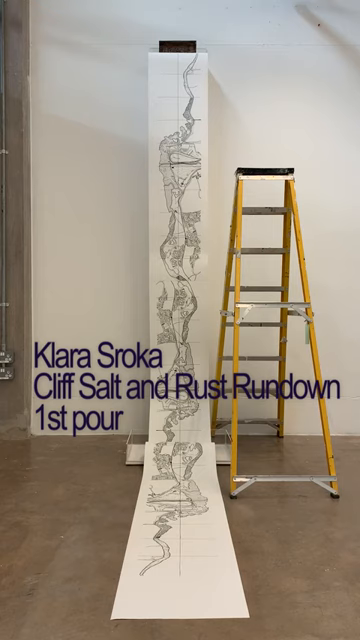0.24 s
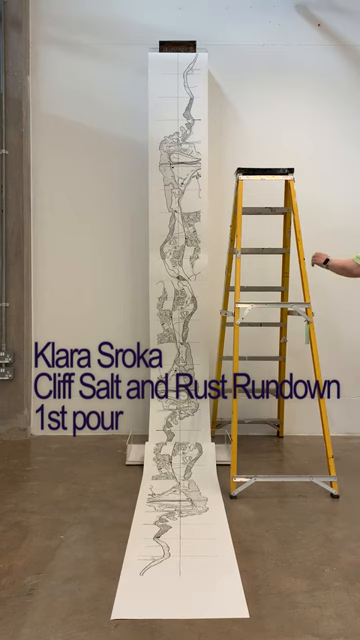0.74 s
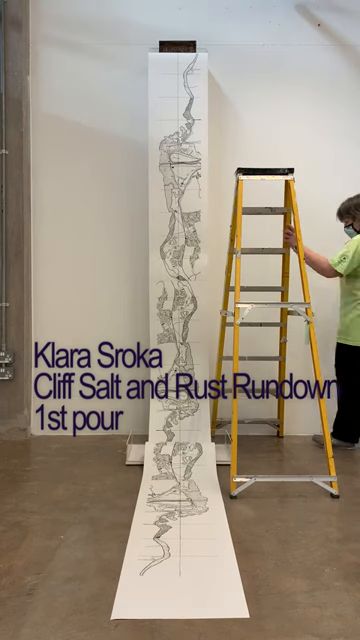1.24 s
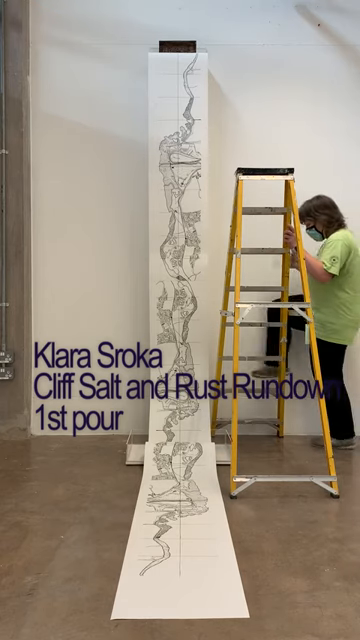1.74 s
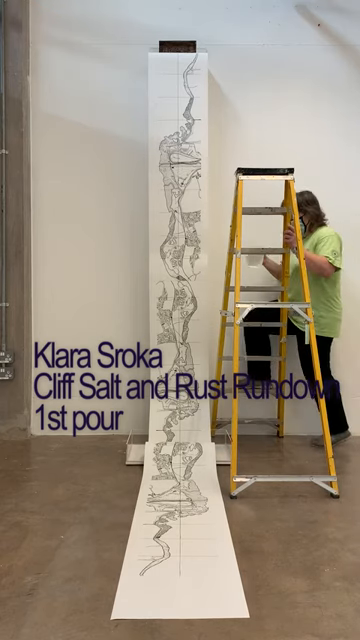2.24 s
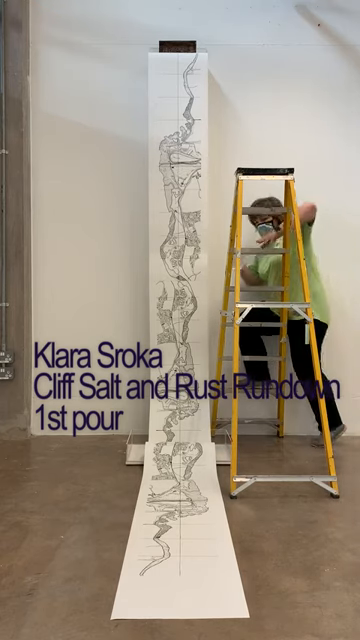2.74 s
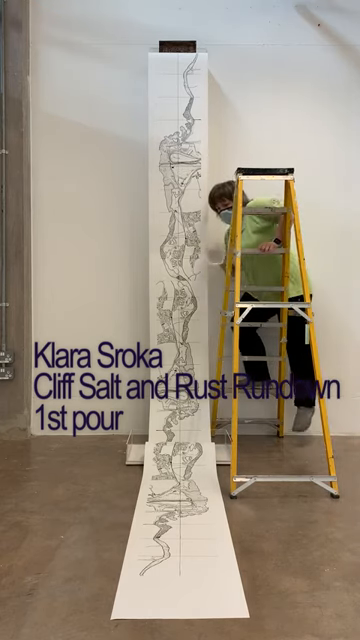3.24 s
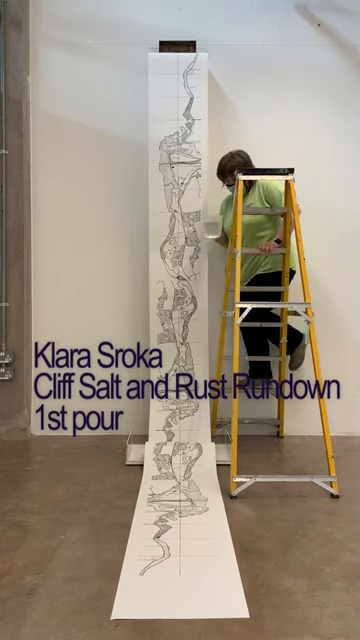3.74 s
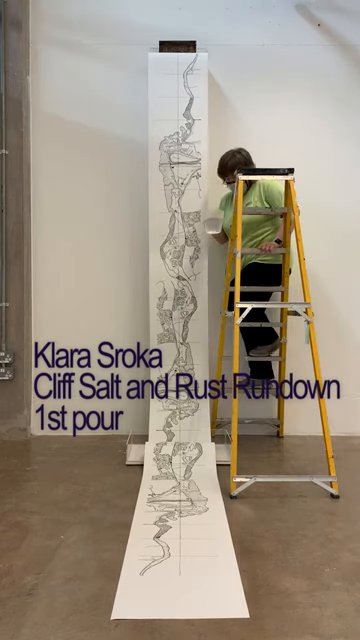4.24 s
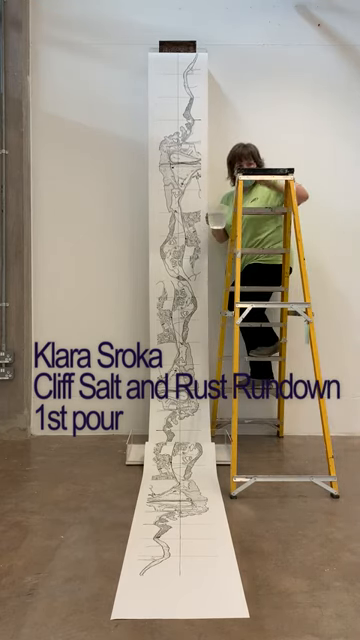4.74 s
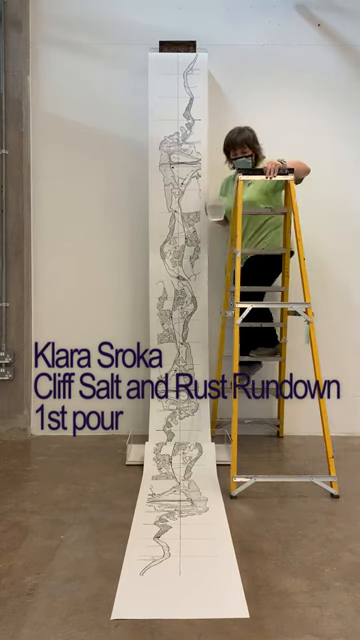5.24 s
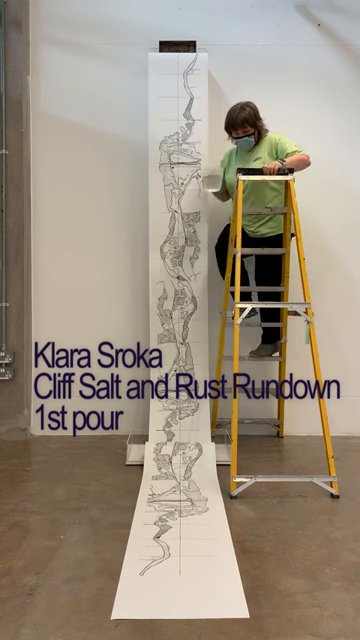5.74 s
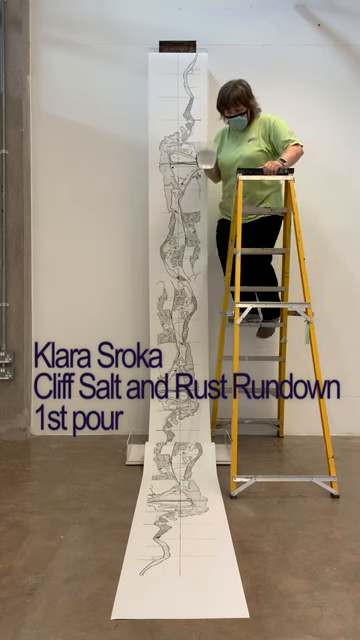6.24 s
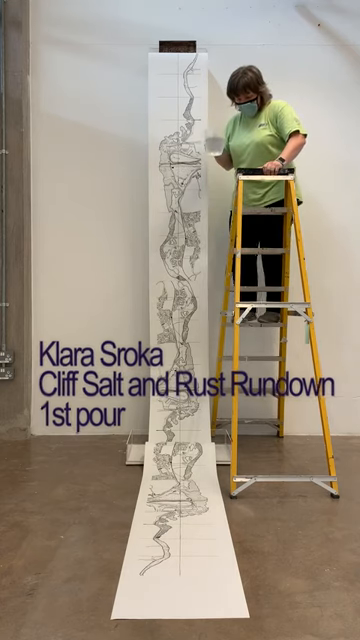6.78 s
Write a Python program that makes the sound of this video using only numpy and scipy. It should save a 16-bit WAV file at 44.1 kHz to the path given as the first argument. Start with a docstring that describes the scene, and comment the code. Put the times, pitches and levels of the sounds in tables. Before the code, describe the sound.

In a bare, reverberant room with low ventilation rumble and hum, soft footfalls and scuffing soles approach. After two seconds a rubber squeak and knocks mark the first step onto a stepladder. Its loose joints then clack sharply and rattle, with clothes swishing and dull shoe knocks on the rungs, busiest after five seconds. A stereo microphone hears it with a half-second tail.

```python
"""In a bare, hard-walled gallery, someone walks up to a tall stepladder and climbs it.
Shoes scuff and squeak by friction and knock on floor and ladder as filtered bursts of noise.
As the weight shifts, loose joints clack in short bright bursts; narrow and broad resonances ring with the blows.
Ventilation hums and hisses below; decaying noise gives the climber and ladder a tail of about half a second."""
import sys
import numpy as np
from scipy import signal
from scipy.fft import rfft, irfft, next_fast_len
from scipy.io import wavfile

SR = 44100
rng = np.random.default_rng(int(sys.argv[2]) if len(sys.argv) > 2 else 0)


def to_wav(sig):
    """Store sig (one row per channel, or 1-D mono) as 16-bit WAV at the path in sys.argv[1].

    Samples outside -1..1 are clipped; the rate is SR.
    """
    pcm = np.clip(np.atleast_2d(sig), -1, 1) * 32767
    pcm = np.round(pcm).astype(np.int16)
    wavfile.write(sys.argv[1], SR, pcm.T)  # frames by channels


N = 309141
TIME = np.arange(N) / SR
SIZE = next_fast_len(N + SR, True)
BIN_HZ = np.maximum(np.arange(SIZE // 2 + 1) * SR / SIZE, 1)


def from_db(db):
    """Logarithmic level: decibels become an amplitude ratio."""
    return 10 ** (np.asarray(db) / 20)


def rms_one(x):
    """Normalisation: a signal is scaled to unit mean power."""
    return x / np.sqrt(np.mean(x ** 2) + 1e-20)


def at_hz(points, hz):
    """Interpolation: a table is read along logarithmic frequency."""
    known_hz, values = np.transpose(points)
    return np.interp(np.log(hz), np.log(known_hz), values)


def coloured(x, spectrum):
    """Minimum-phase filtering: a folded cepstrum gives a causal filter; white noise keeps its power."""
    magnitude = rms_one(from_db(at_hz(spectrum, BIN_HZ)))
    cepstrum = irfft(np.log(magnitude), SIZE)
    cepstrum[1:SIZE // 2] *= 2
    cepstrum[SIZE // 2 + 1:] = 0
    response = np.exp(rfft(cepstrum))
    return irfft(rfft(x, SIZE) * response, SIZE)[..., :N]


def drift(rate):
    """Slow random modulation: interpolated chance with unit rms and `rate` knots a second."""
    knots = rng.standard_normal(8192)
    return rms_one(np.interp(TIME * rate, np.arange(len(knots)), knots))


def swell(peak_s, rise_s, fall_s, level_db):
    """Exponential growth and decay: an envelope builds to its peak and dies away again."""
    since = TIME - peak_s
    time_constant = np.where(since < 0, rise_s, fall_s)
    return from_db(level_db) * np.exp(-np.abs(since / time_constant))


EVENNESS = .3   # 0: a contact keeps deep random peaks and dips, 1: a flat spectrum
PLACES = 5   # spots of contact, each with its own path through the room


def contacts(starts, levels_db, decays, rise, tops_hz=None, count=PLACES):
    """Dispersion: each contact is a click smeared into a dying burst, dealt in turn to a spot (times in s)."""
    out, age = np.zeros((count, N + SR)), TIME[:SR // 6]
    for k, (start, level_db, decay) in enumerate(np.broadcast(starts, levels_db, decays)):
        shape = np.exp(-age / decay) * (1 - np.exp(-age / rise))
        burst = rng.standard_normal(len(age)) * shape
        for _ in range(2):   # dispersion spreads a click in time but leaves its spectrum fairly even
            spectrum = rfft(burst)
            evened = spectrum / (np.abs(spectrum) + 1e-12) ** EVENNESS
            burst = irfft(evened, len(age)) * shape ** (1 / 4)
        burst = from_db(level_db) * burst / np.linalg.norm(burst)   # the level sets the energy
        if tops_hz is not None:   # a softer slip has less treble
            lowpass = signal.butter(2, min(tops_hz[k], .45 * SR), fs=SR)
            burst = signal.lfilter(*lowpass, burst)
        at = int(start * SR)
        out[k % count, at:at + len(age)] += burst
    return out[:, :N]


# Spectrum of the moving air. Each row: frequency in Hz, relative density in dB per Hz.
AIR_SPECTRUM = [(20, -13.5), (40, -6.5), (65, -1.5), (90, -4.5), (150, -8.5), (190, -14.5), (245, -11),
                (320, -21), (600, -26), (950, -27), (1500, -29.5), (2600, -37), (6000, -38), (10000, -39),
                (15500, -42.5)]
AIR_DB, HUM_HZ = -58.5, 74.3
# the fan's hum holds steady on average, then sinks to a fainter level
HUM_EARLY_DB, HUM_LATE_DB, HUM_SINKS_AT_S, HUM_SINK_S = -57.5, -72.5, 2.05, .4


def ventilation(waver_hz, flutter_db, octave_db):
    """Broadband flow noise and tonal fan noise: diffuse rumble and hiss, a wavering hum and its octave."""
    air = from_db(AIR_DB) * coloured(rng.standard_normal((2, N)), AIR_SPECTRUM)
    phase = 2 * np.pi * np.cumsum(HUM_HZ + waver_hz * drift(12)) / SR
    tone = np.sin(phase) + from_db(octave_db) * np.sin(2 * phase)
    sinking = np.exp(-np.maximum(TIME - HUM_SINKS_AT_S, 0) / HUM_SINK_S)
    hum_db = HUM_LATE_DB + (HUM_EARLY_DB - HUM_LATE_DB) * sinking
    return air + from_db(hum_db + flutter_db * drift(7.5)) * tone


# Weight shifts booming through the floor. Each row: start in seconds, relative level in dB.
FLOOR_BOOMS = [(.019, -50), (.28, -50), (.42, -53), (.84, -54), (1.432, -45.5), (3.728, -54), (4.819, -55),
               (4.901, -48), (6.952, -48)]
# Spectrum of a boom. Each row: frequency in Hz, relative density in dB per Hz.
BOOM_SPECTRUM = [(25, -5.5), (55, 6), (90, -4.5), (150, -27), (400, -49.5)]


def floor_booms(boom_db):
    """Low-frequency impact: body weight settling gives a soft, very low thud."""
    start, level_db = np.transpose(FLOOR_BOOMS)
    thud = contacts(start, level_db + boom_db, decays=0.021, rise=0.015, count=1)[0]
    return coloured(thud, BOOM_SPECTRUM)


# Soft footfalls. Each row: peak in seconds, relative level in dB.
SOFT_FOOTFALLS = [(.035, -59.5), (0.283, -54.5), (.45, -63), (.79, -58), (.85, -56), (1.09, -65),
                  (1.235, -63), (3.745, -74), (3.87, -63.5)]
# A sole drags harder until it grips. Each row: moment of grip in seconds, swell in seconds, relative level in dB.
SOLE_SLIDES = [(.02, 0.046, -64.5), (.3, 0.11, -66), (.46, 0.11, -68.5), (.85, 0.16, -61),
               (1.09, 0.11, -63.5), (3.75, 0.063, -54.5), (3.84, .025, -54)]
# Clothes swish as a limb swings. Each row: middle in seconds, rise and fall in seconds, relative level in dB.
CLOTH_SWISHES = [(.88, 0.068, -67), (1.23, 0.023, -65), (2.76, 0.18, -72.5), (3.045, 0.028, -60.5),
                 (3.76, 0.11, -62.5), (4.09, 0.088, -69.5)]
# Spectra of footfall, scuff and cloth. Each row: frequency in Hz, relative density in dB per Hz.
FOOTFALL_SPECTRUM = [(60, -20), (150, -1.5), (250, 0.5), (400, -7.5), (800, -22.5), (3000, -47)]
SCUFF_SPECTRUM = [(200, 5), (450, -0.5), (850, 6), (1350, 0), (2200, -10), (4000, -22), (9000, -53)]
CLOTH_SPECTRUM = [(1000, 2), (3000, 0.5), (7000, -2), (12000, -3.5), (16000, -7.5)]
FOOTFALL_ATTACK_S, FOOTFALL_RELEASE_S, SLIDE_RELEASE_S = 0.0083, 0.074, 0.049
CLOTH_REST_DB = -85.5   # faint rubbing between swishes


def movement(footfall_db, scuff_db, cloth_db, grain_db):
    """Friction noise: soft footfalls, soles that catch unevenly as they slide, and rubbing clothes."""
    footfall = sum(swell(peak_s, FOOTFALL_ATTACK_S, FOOTFALL_RELEASE_S, db + footfall_db)
                   for peak_s, db in SOFT_FOOTFALLS)
    scuff = sum(swell(grip_s, rise_s, SLIDE_RELEASE_S, db + scuff_db) for grip_s, rise_s, db in SOLE_SLIDES)
    swish = sum(swell(middle_s, width_s, width_s, db + cloth_db) for middle_s, width_s, db in CLOTH_SWISHES)
    cloth = from_db(CLOTH_REST_DB) + swish
    friction = rms_one(rng.standard_normal(N) * from_db(grain_db * drift(140)))
    treads = coloured(rng.standard_normal(N) * footfall, FOOTFALL_SPECTRUM)
    scuffs = coloured(friction * scuff, SCUFF_SPECTRUM)
    rustle = coloured(rng.standard_normal(N) * cloth, CLOTH_SPECTRUM)
    return treads + scuffs + rustle


# Rubber soles sticking and slipping. Each row: start in seconds, length in seconds, first frequency in Hz,
# last frequency in Hz, level in dB.
SOLE_SQUEAKS = [(0.253, 0.015, 1450, 1410, -61.5), (1.015, 0.033, 1180, 1223, -55),
                (1.074, 0.0081, 1345, 1196, -65), (2.157, 0.031, 2160, 2010, -39.5),
                (2.165, .022, 1830, 1660, -50), (2.336, 0.017, 2150, 2040, -61),
                (2.374, 0.018, 2040, 1930, -73), (3.248, 0.094, 401, 385.6, -58),
                (3.265, 0.067, 526, 550, -58), (3.831, 0.012, 1450, 1370, -48.5),
                (4.185, 0.012, 3860, 3300, -45)]


def squeaks(jitter, rough_db, overtone_db):
    """Stick-slip oscillation: rubber gives a short, unsteady gliding tone."""
    out = np.zeros(N)
    waver = 1 + jitter * drift(500)
    grip = from_db(rough_db * drift(250))
    for start, length, first_hz, last_hz, level_db in SOLE_SQUEAKS:
        progress = np.clip((TIME - start) / length, 0, 1)
        live = (progress > 0) & (progress < 1)
        glide_hz = first_hz + (last_hz - first_hz) * progress[live]
        phase = 2 * np.pi * np.cumsum(glide_hz * waver[live]) / SR
        tone = np.sin(phase) + from_db(overtone_db) * np.sin(2 * phase)
        tone = rms_one(tone * grip[live])
        out[live] += from_db(level_db) * tone * np.sqrt(np.sin(np.pi * progress[live]))
    return out


# Shoes and hands knocking on floor and ladder. Each row: start in seconds, relative level in dB,
# low thump in dB relative to that.
SHOE_AND_HAND_KNOCKS = [(0.839, -60.5, 9.5), (1.936, -44.5, -9.5), (2.160, -48.5, -6), (2.321, -40, -13.5),
                        (2.352, -47.5, -4.5), (2.38, -51.5, -24), (2.891, -51.5, -17), (3.479, -39, -19),
                        (3.798, -42, -7), (3.831, -44.5, -15), (4.188, -52.5, 2), (4.595, -45.5, -10),
                        (4.863, -52, -1), (5.185, -64, -15), (5.385, -60, -8), (5.913, -42.5, -12),
                        (6.526, -50.5, -16), (6.581, -38.5, -3.5), (6.606, -61, 10), (6.745, -43, -4)]
# Spectra of knock and thump. Each row: frequency in Hz, relative density in dB per Hz.
KNOCK_SPECTRUM = [(200, -19.5), (700, -0.5), (1200, 6.5), (1900, 4), (3000, -4.5), (6000, -10.5),
                  (15000, -42)]
THUMP_SPECTRUM = [(50, -14.5), (150, 1.5), (330, -2.5), (530, 4.5), (800, -3), (1400, -10.5), (4000, -34)]
KNOCK_DECAY_S, THUMP_DECAY_S = 0.016, 0.0091


def knocks(knock_db, thump_db):
    """Impact: a sole meets floor or rung with a dull knock; the weight follows as a slower-rising thump."""
    start, level_db, low_db = np.transpose(SHOE_AND_HAND_KNOCKS)
    knock = contacts(start, level_db + knock_db, KNOCK_DECAY_S, rise=0.0007)
    thump = contacts(start, level_db + low_db + thump_db, THUMP_DECAY_S, rise=0.0081)
    return coloured(knock, KNOCK_SPECTRUM) + coloured(thump, THUMP_SPECTRUM)


# Riveted joints slipping under load. Each row: start in seconds, relative level in dB, treble crack in dB
# relative to that, base chatter decay in seconds (scaled for each part), top of the crack in Hz.
JOINT_CLACKS = [(2.152, -38.5, -2, 0.013, 4800), (3.049, -31.5, -1, .007, 14300),
                (3.183, -28.5, -1, 0.014, 11400), (4.185, -42.5, 0.5, 0.0053, 7900),
                (4.441, -40, -2, 0.0094, 11300), (4.58, -54, -1, 0.0058, 8000),
                (5.106, -44.5, -17, 0.0071, 12000), (5.128, -30.5, -0.5, 0.002, 16000),
                (5.181, -27.5, -2.5, 0.0039, 11300), (5.264, -41.5, -1.5, 0.0034, 10400),
                (5.36, -41.5, -8.5, 0.0096, 14960), (5.385, -43.5, -2.5, .0035, 7550),
                (5.740, -37.5, 0, 0.0072, 17500), (5.909, -27, -2, 0.0064, 15000),
                (6.117, -44.5, -6, 0.0095, 7400), (6.198, -40, 0.5, 0.0039, 18300),
                (6.711, -30, -4, 0.021, 15000), (6.740, -30, 3, .004, 15600)]
# Spectra of frame jolt and metal crack. Each row: frequency in Hz, relative density in dB per Hz.
FRAME_SPECTRUM = [(100, -27), (300, -16), (750, -11.5), (1100, -0.5), (1700, 2), (2600, 1), (4000, 0),
                  (5500, -4.5), (9000, -71)]
CRACK_SPECTRUM = [(1500, -24), (3300, -11), (6200, 2), (8000, -4), (11000, -2), (16000, -1)]
REBOUNDS, REBOUND_LOSS_DB = 3, 2.5   # a slack joint rattles on, weaker at each touch


def joints(frame_db, crack_db, creep_db, creep_lead, rebound_db):
    """Slip under load: a joint creeps for a moment, then jolts the frame, cracks brightly and rattles."""
    start, level_db, treble_db, decay, top_hz = np.transpose(JOINT_CLACKS)
    bright_db = level_db + treble_db
    jolt = contacts(start, level_db + frame_db, decay * 3.26, rise=0.00074)
    crack = contacts(start, bright_db + crack_db, decay * 1.4, rise=0.00097, tops_hz=top_hz)
    creep = contacts(start - creep_lead, level_db + creep_db, decay, rise=0.0004)
    gaps_s = rng.uniform(.006, .02, (len(start), REBOUNDS))
    touches = start + np.cumsum(gaps_s, axis=1).T
    rattle = 0
    for k, touch in enumerate(touches):
        touch_db = bright_db + rebound_db - k * REBOUND_LOSS_DB
        rattle = rattle + contacts(touch, touch_db, decay * 0.22, rise=0.00039, tops_hz=top_hz)
    return coloured(jolt + creep + rattle, FRAME_SPECTRUM) + coloured(crack + creep + rattle, CRACK_SPECTRUM)


# Resonances of the blows, with broad treble peaks. Each row: frequency in Hz, bandwidth in Hz,
# level in dB relative to the blow.
BLOW_RESONANCES = [(400, 23, -19), (540, 130, -4.5), (1095, 37, -2), (1250, 84, -6.5), (1450, 23, -22),
                   (1677, 96, -0.5), (1847, 51, -2.5), (2040, 7.2, -18), (2217, 13, -26), (3060, 73, -5),
                   (3520, 30, -12), (5700, 1100, -22.5), (6780, 71, -6), (7360, 27, -25), (9000, 740, -3),
                   (9840, 280, 1), (11670, 68, -1.5), (12840, 300, 2)]


def resonate(force):
    """Resonance: a blow is passed on and rings at several narrow and broad resonances."""
    out = force.copy()
    for hz, width_hz, level_db in BLOW_RESONANCES:
        r = np.exp(-np.pi * width_hz / SR)
        poles = [1, -2 * r * np.cos(2 * np.pi * hz / SR), r * r]
        zeros = np.array([1, 0, -1]) * (1 - r * r) / 2
        out += from_db(level_db) * signal.lfilter(zeros, poles, force + 1e-18)
    return out


# Reverberation time of the gallery. Each row: frequency in Hz, time to fall 60 dB in seconds.
REVERB_TIME = [(100, .62), (500, .58), (1500, .55), (3000, .53), (6000, .42), (10000, .31), (16000, .24)]
# Strength of the reverberation. Each row: frequency in Hz, level in dB against the direct sound.
REVERB_LEVEL = [(100, 8.5), (600, 1), (1500, 0), (3500, -1), (7000, -3), (15000, -7.5)]


def gallery(spots, build_up, early_s, early_db):
    """Reverberation: direct sound, strong early reflections and a diffuse tail, dying sooner in the treble."""
    age, tails = TIME[:SR * 2 // 3], 0
    white = rng.standard_normal((2, 2, len(spots), len(age)))
    edges = np.geomspace(60, 18000, 15)
    early = from_db(early_db / (1 + (age / early_s) ** 4))
    onset = 1 - np.exp(-(age / build_up) ** 2)
    for k, band in enumerate(zip(edges, edges[1:])):
        hz = np.sqrt(band[0] * band[1])
        decay = early * from_db(-60 * age / at_hz(REVERB_TIME, hz)) * onset
        bandpass = signal.butter(2, band, "band", fs=SR, output="sos")
        noise = signal.sosfilt(bandpass, white[k % 2])   # neighbouring bands use separate noise
        tails = tails + noise * decay / np.linalg.norm(decay) * from_db(at_hz(REVERB_LEVEL, hz))
    reflected = irfft((rfft(spots, SIZE) * rfft(tails, SIZE)).sum(axis=1), SIZE)[:, :N]
    return spots.sum(axis=0) + reflected


# Stereo microphone. Each row: frequency in Hz, phase between its two ports in turns.
PORT_TURNS = [(0, .02), (70, .04), (130, .07), (260, .18), (550, .25), (1050, .13), (1700, .16),
              (2300, .24), (3200, .21), (4000, .3), (4400, .42), (5100, .58), (6300, .93), (7300, 1.06),
              (8500, 1.41), (9400, 1.6), (10500, 1.92), (11700, 2.08), (12700, 2.4), (13700, 2.62),
              (14800, 2.93), (16000, 3.02)]


def microphone(field):
    """Phase difference: the ports swing the sound between mid and side as the frequency rises."""
    angle = np.pi * np.interp(BIN_HZ, *np.transpose(PORT_TURNS))   # half the phase, in radians
    front, across = rfft(field, SIZE)
    mid, side = front * np.cos(angle), 1j * across * np.sin(angle)
    return irfft(np.array([mid + side, mid - side]), SIZE)[:, :N]


def scene():
    """Superposition: climber and ladder in the gallery add to floor booms and ventilation."""
    slips = joints(frame_db=22.0, crack_db=27.0, creep_db=6.5, creep_lead=0.0026, rebound_db=12)
    blows = resonate(slips + knocks(knock_db=15.5, thump_db=21.5))
    rubbing = squeaks(jitter=0.049, rough_db=6.0, overtone_db=-14)
    rubbing = rubbing + movement(footfall_db=-2.5, scuff_db=0, cloth_db=0.5, grain_db=3)
    room = gallery(np.vstack([blows, rubbing]), build_up=0.0008, early_s=0.033, early_db=2.5)
    booms = floor_booms(boom_db=28.5)
    field = room + booms + ventilation(waver_hz=1.3, flutter_db=3, octave_db=-10.5)
    return microphone(field) * from_db([[-.2], [.2]])   # left, right


def record(dry):
    """Low-pass filtering: a steep elliptic filter cuts the top."""
    lowpass = signal.ellip(12, .1, 70, 15950, fs=SR, output="sos")   # order, ripple dB, stopband dB, cutoff Hz
    return signal.sosfilt(lowpass, dry)


dry = scene()
out = record(dry)
to_wav(out)
```